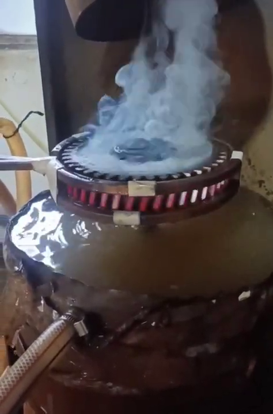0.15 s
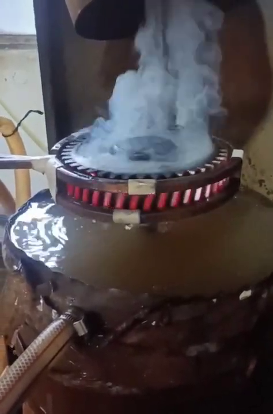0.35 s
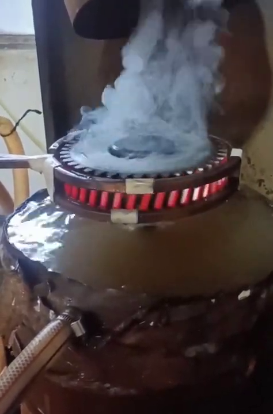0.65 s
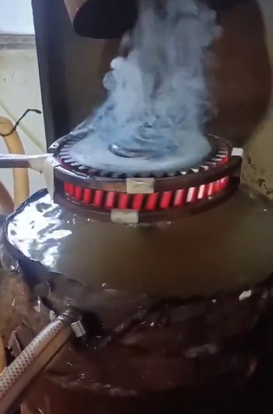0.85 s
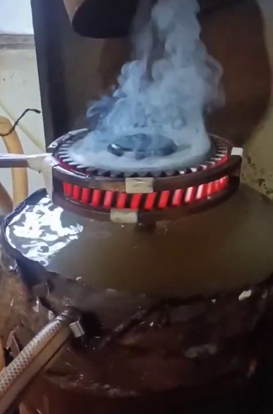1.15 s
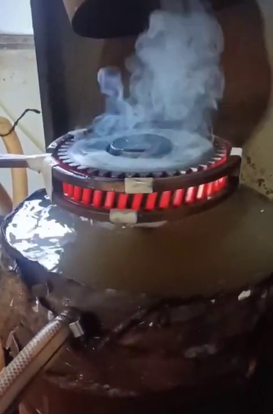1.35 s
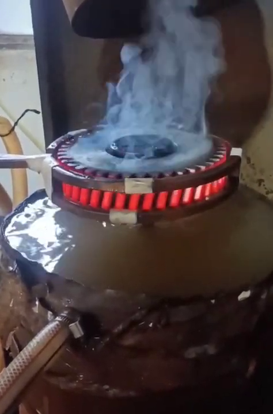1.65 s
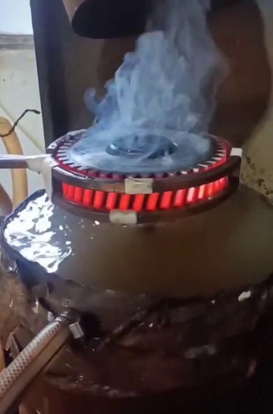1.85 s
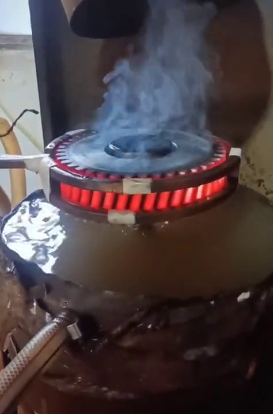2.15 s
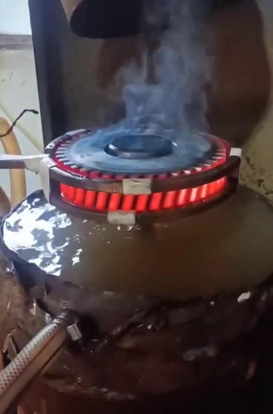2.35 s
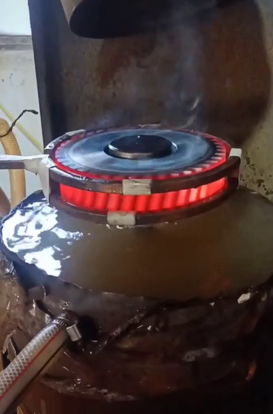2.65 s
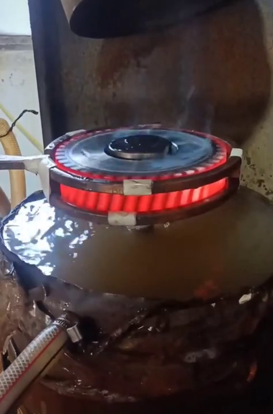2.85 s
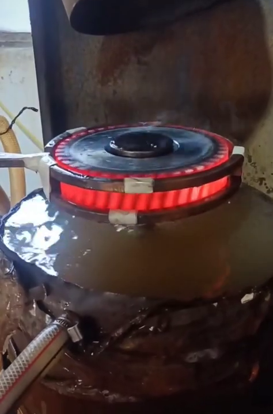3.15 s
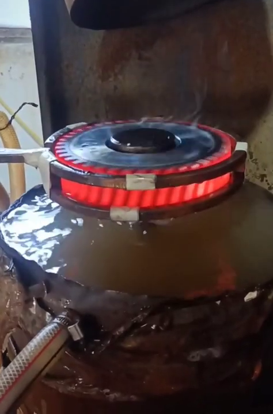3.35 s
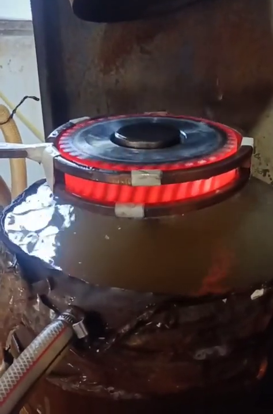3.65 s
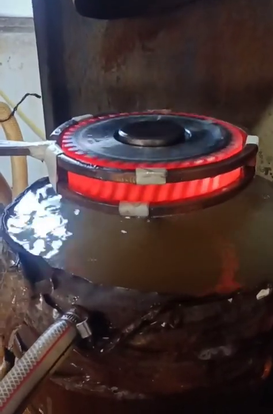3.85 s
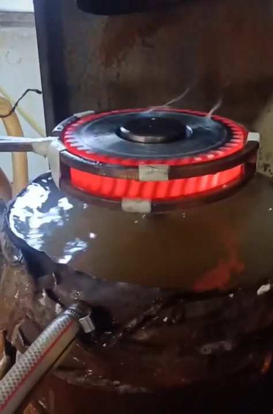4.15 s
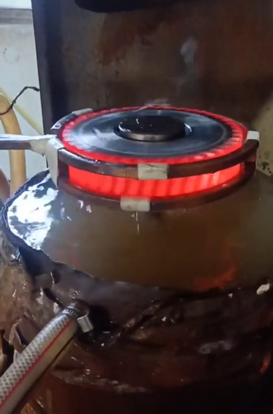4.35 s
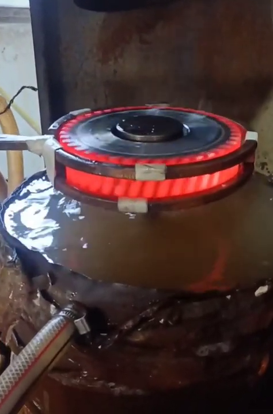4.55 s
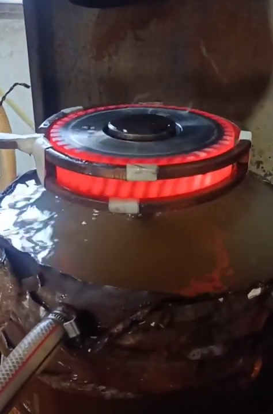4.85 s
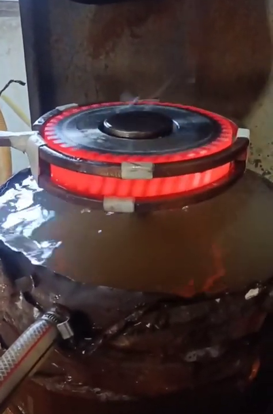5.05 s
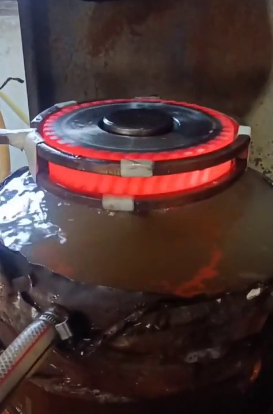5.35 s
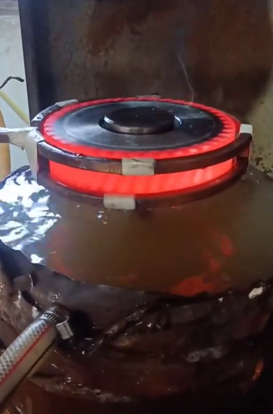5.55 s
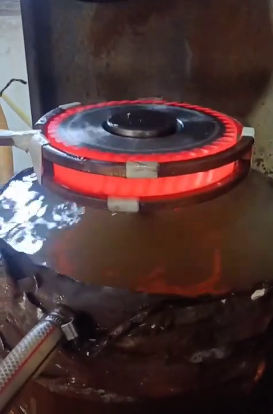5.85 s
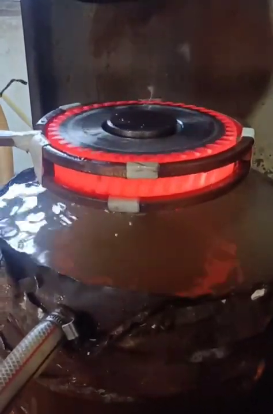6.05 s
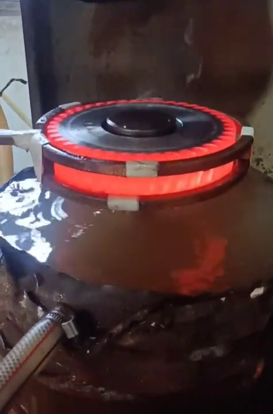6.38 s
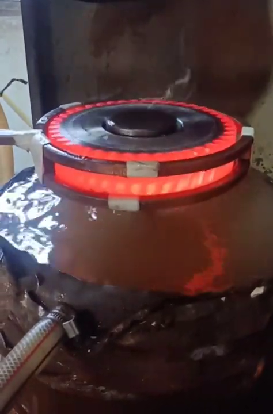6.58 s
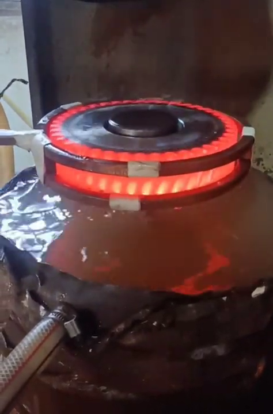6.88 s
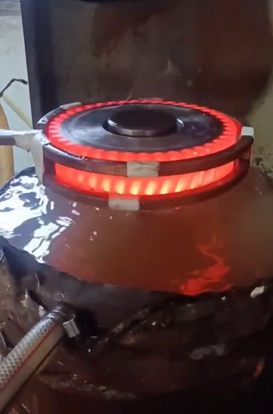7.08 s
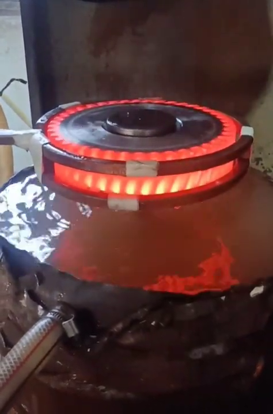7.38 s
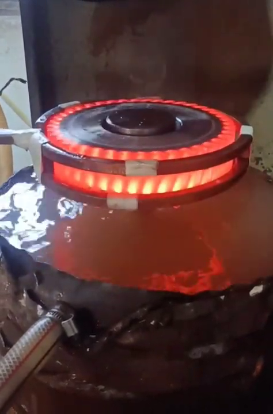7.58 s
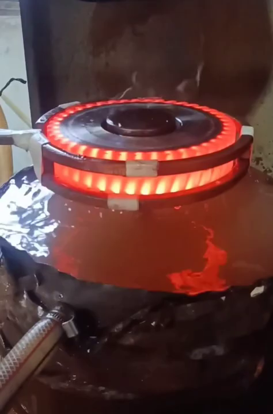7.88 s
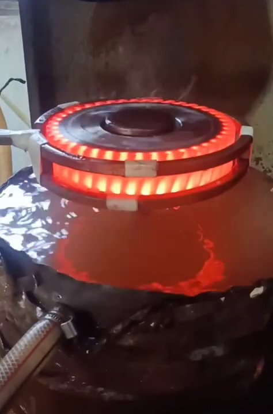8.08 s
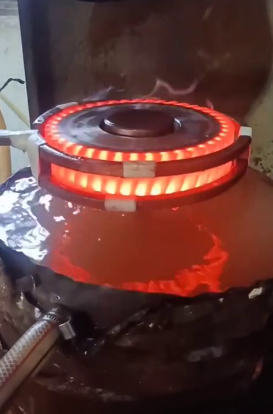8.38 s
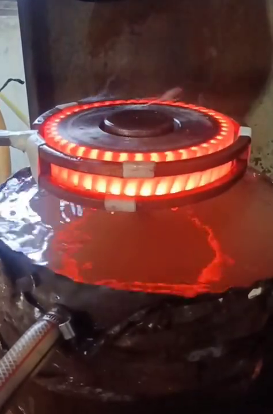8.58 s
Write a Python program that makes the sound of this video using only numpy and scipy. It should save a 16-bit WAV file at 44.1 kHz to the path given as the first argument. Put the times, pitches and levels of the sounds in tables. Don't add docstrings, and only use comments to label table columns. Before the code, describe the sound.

A noisy workshop heard through a phone close to an induction heater. Fans and pumps roar steadily with low hums, air hiss and fine water spray, the level surging and sagging under noise suppression. A faint, piercing coil whine near ten kilohertz creeps upward. At about seven seconds a hand tool further off spins up, whining higher with whistling air, loudest just before the end.

```python
import sys
import numpy as np
from scipy import signal
from scipy.fft import rfft, irfft, next_fast_len
from scipy.io import wavfile
from scipy.ndimage import uniform_filter1d

SR = 44100
rng = np.random.default_rng(int(sys.argv[2]) if len(sys.argv) > 2 else 0)


def gain_from_db(level_db):
    decades = np.asarray(level_db, float) / 20
    return 10 ** decades


def put_to_file(sound):
    columns = np.atleast_2d(sound).T
    safe = np.clip(columns, -1, 1)
    whole_steps = np.round(safe * 32767)
    wavfile.write(sys.argv[1], SR, whole_steps.astype(np.int16))


N = 384552

# middle_s, length_s, floor_rise_db
THINNING = [(.65, .1, 7), (1.1, .25, 2.5), (2.6, .5, 3), (3.35, .14, 6), (4.4, .3, 3), (5.3, .2, 3),
            (6.5, .4, 1.5), (7.3, .4, 2), (7.86, .55, -4), (8.3, .2, 3.5), (8.58, .26, 6)]


def curves(table):
    s, *columns = np.transpose(table)
    return [np.interp(np.arange(N) / SR, s, c) for c in columns]


def across(table, hz):
    f, v = np.transpose(table)
    return np.interp(np.log(hz + 1), np.log(f), v)


def bumps(rows):
    t = np.arange(0, N + 64, 64) / SR
    middle_s, length_s, height = np.transpose(rows)[:, :, None]
    swells = height / (1 + (2 * (t - middle_s) / length_s) ** 6)
    return np.interp(np.arange(N) / SR, t, np.sum(swells, axis=0))


def sides(db, lean_db):
    left = 1 / (1 + gain_from_db(-2 * lean_db))
    return gain_from_db(db) * np.sqrt(2 * np.array([left, 1 - left]))


def walk(rate):
    k = int(SR / rate)
    held = np.repeat(rng.standard_normal(N // k + 1), k)
    return 1.28 * uniform_filter1d(uniform_filter1d(held, k), k)[:N]


def both_walk(rate):
    return np.array([walk(rate), walk(rate)])


def unit(x):
    return x / np.sqrt(np.mean(x ** 2))


def hiss(table, lo_hz, hi_hz, count, flicker_db, rate, lag_s=0):
    # pitch_hz, likeness_0_to_1
    likeness = [(60, 0.86), (130, 0.99), (290, 0.88), (640, 0.42), (1000, 0.01), (3000, 0.26), (7000, 0),
                (12000, 0.3)]
    size = next_fast_len(N)
    hz = np.arange(size // 2 + 1) * SR / size
    one, other = rfft(rng.standard_normal((2, size)))
    alike = np.clip(across(likeness, hz), 0, 1)
    late = one * np.exp(-2j * np.pi * hz * lag_s)
    right = alike * late + np.sqrt(1 - alike ** 2) * other
    pair = np.array([one, right]) * gain_from_db(across(table, hz))
    place = count * np.log((hz + 1) / lo_hz) / np.log(hi_hz / lo_hz)
    inside = (place > 0) & (place < count)
    out = 0
    for k in range(count + 1):
        share = np.sqrt(np.clip(1 - np.abs(place - k), 0, 1)) * inside
        out = out + irfft(pair * share, size)[:, :N] * gain_from_db(flicker_db * both_walk(rate))
    return unit(out)


def wavering(hz, width_hz):
    pole = [1, -np.exp(-1.5 * np.pi * width_hz / SR)]
    drift = signal.lfilter([1], np.convolve(pole, pole), rng.standard_normal((2, N)))
    turning = np.exp(2j * np.pi * np.cumsum(hz * np.ones(N)) / SR)
    return unit(np.real((drift[0] + 1j * drift[1]) * turning))


def suppressor():
    # time_s, left_db, right_db
    rest = [(0.0, -4.13, -3.22), (1.09, -2.08, -1.5), (2.18, -2.06, -2.09), (3.27, -5.24, -3.76),
            (4.36, -4.34, 0.53), (5.45, -7.53, -7.26), (6.54, -7.9, -8.55), (7.63, -5.48, -5.02),
            (8.72, -3.17, -6.72)]
    # middle_s, length_s, lift_db
    left_surges = [(-0.028, 0.129, 5.5), (0.096, 0.044, -3.1), (0.149, 0.174, 3.9), (0.839, 0.045, -2.5),
                   (0.918, 0.04, -2.1), (0.929, 0.637, 4.1), (0.982, 0.041, 2.5), (1.454, 0.04, -2.4),
                   (1.53, 0.343, 7.2), (1.671, 0.117, 3.3), (1.802, 0.072, 2.5), (1.965, 0.057, -3.7),
                   (2.013, 0.088, 1.4), (2.085, 0.413, 3.6), (2.168, 0.061, -3.4), (0.2, 0.06, 3.0),
                   (2.44, 0.071, -2.5), (2.598, 0.407, 2.8), (2.792, 0.065, 2.7), (2.881, 0.082, -2.4),
                   (3.08, 0.106, -5.0), (3.133, 0.4, 9.6), (3.397, 0.06, 2.3), (3.71, 0.074, 4.6),
                   (5.45, 0.07, 3.5), (3.951, 0.187, 6.7), (4.0, 0.029, -2.3), (4.21, 0.03, -2.2),
                   (4.288, 0.092, -5.6), (4.288, 0.33, 11.2), (4.417, 0.027, 2.8), (4.547, 0.161, 5.6),
                   (4.79, 0.11, 6.5), (4.93, 0.366, 9.4), (4.983, 0.129, -5.5), (5.089, 0.046, 4.8),
                   (5.304, 0.279, 3.1), (5.371, 0.04, 4.3), (5.621, 0.082, 2.6), (5.791, 0.152, 8.4),
                   (5.792, 0.041, -2.6), (6.08, 0.082, 6.7), (6.219, 0.032, -2.2), (6.42, 0.093, 1.7),
                   (6.696, 0.229, 6.5), (6.85, 0.06, 3.0), (6.766, 0.025, -2.4), (6.986, 0.115, -8.9),
                   (7.01, 0.28, 12.9), (7.073, 0.046, -5.3), (7.241, 0.034, 2.8), (7.252, 0.159, 5.3),
                   (7.557, 0.131, 4.8), (7.675, 0.026, 2.3), (7.847, 0.037, -1.6), (8.041, 0.037, -2.1),
                   (8.213, 0.097, 1.4), (8.507, 0.071, 1.7), (8.563, 0.034, -1.8), (5.19, 0.07, 6.0)]
    # middle_s, length_s, lift_db
    right_surges = [(0.068, 0.332, 5.6), (0.071, 0.086, -2.2), (0.204, 0.063, 1.6), (0.488, 0.167, 2.2),
                    (0.666, 0.046, 2.3), (0.575, 0.1, -2.5), (1.175, 0.579, 2.3), (1.5, 0.453, 3.9),
                    (1.727, 0.155, 3.8), (2.156, 0.433, 5.6), (2.614, 0.035, -2.4), (2.764, 0.124, 1.8),
                    (2.846, 0.045, -1.8), (2.939, 0.091, 1.9), (3.139, 0.238, 7.8), (3.48, 0.101, 4.8),
                    (3.603, 0.034, -3.1), (1.875, 0.1, -3.0), (3.746, 0.299, 5.2), (3.788, 0.081, -3.2),
                    (3.927, 0.063, 4.5), (4.168, 0.045, -3.0), (4.213, 0.383, 3.2), (4.254, 0.063, 1.9),
                    (4.324, 0.059, -3.0), (4.459, 0.118, 3.5), (2.5, 0.07, 3.0), (4.619, 0.037, 2.5),
                    (4.86, 0.04, -3.3), (4.937, 0.426, 6.1), (4.955, 0.097, -2.2), (5.052, 0.089, 2.4),
                    (5.176, 0.056, 6.6), (5.358, 0.142, 3.7), (5.554, 0.054, 4.3), (5.672, 0.085, -4.1),
                    (5.723, 0.458, 4.8), (5.808, 0.055, 6.3), (5.925, 0.061, -4.4), (7.185, 0.05, -3.0),
                    (6.118, 0.156, 6.8), (6.161, 0.039, -2.4), (6.574, 0.044, -2.2), (6.696, 0.054, -3.3),
                    (6.781, 0.037, 2.6), (6.809, 0.412, 9.5), (6.965, 0.052, -2.1), (7.201, 0.259, 6.3),
                    (7.597, 0.037, 3.1), (7.658, 0.148, 3.4), (7.776, 0.072, -2.3), (7.778, 0.411, 6.3),
                    (8.029, 0.167, 4.6), (8.032, 0.038, -2.7), (8.085, 0.037, 1.9), (8.231, 0.039, 1.5),
                    (8.307, 0.07, -1.7), (8.313, 0.241, 1.3), (6.03, 0.1, 2.5), (8.552, 0.06, -2.7)]
    return np.array(curves(rest)) + np.array([bumps(left_surges), bumps(right_surges)])


def placed(ride_db, level_db, lean_db, share):
    return sides(level_db, lean_db)[:, None] * gain_from_db(share * ride_db)


def fans_and_pumps(ride_db):
    # pitch_hz, level_db_per_hz
    bass = [(25, -32), (50, -27.5), (62, -25), (72, -9), (85, -5), (105, -10.5), (125, -6.5), (200, 0.5),
            (222, -8.5), (314, -4.5), (428, -11.5), (560, -11), (760, -14.5), (1000, -14.5)]
    # pitch_hz, width_hz, level_db, left_minus_right_db
    hums = [(142, 12, -39, -4), (245, 10, -46, -4), (314, 20, -46, -4), (604, 8, -47.5, -5),
            (744, 15, -49.5, -4), (851, 20, -51.5, -6), (994, 6, -58, -5), (1733, 8, -55.5, -3)]
    # middle_s, length_s, swell_db
    roar_swells = [(.25, 0.072, 3), (.5, 0.13, 2), (1.33, 0.11, 1), (2.03, 0.053, -2), (2.42, 0.092, 0.5),
                   (2.9, 0.15, 1.5), (3.95, 0.067, 0), (4.1, .08, 2.5), (4.28, 0.11, 1.5),
                   (4.73, 0.13, 1.5), (5.02, 0.14, -1), (5.8, .06, 1.5), (6.12, 0.089, 2), (6.3, 0.13, 3),
                   (7.05, .08, -1.5), (7.88, .1, -2), (8.3, 0.094, -1.5), (8.45, 0.065, 1)]
    # middle_s, length_s, swell_db
    drone_swells = [
        (1.4, 0.41, 5),
        (2.3, 0.76, -6.5),
        (4.3, 0.24, 0),
        (5.05, 0.41, 4),
        (7.15, 0.17, 6),
    ]
    low = placed(ride_db, level_db=-29.5, lean_db=-4.5, share=1) * gain_from_db(bumps(roar_swells))
    roar = low * hiss(bass, lo_hz=27.4, hi_hz=1009, count=6, flicker_db=1.5, rate=9.7)
    tones = 0
    for hz, width_hz, db, lean_db in hums:
        swell_db = bumps(drone_swells) if hz < 200 else walk(6) - .7
        tones = tones + sides(db, lean_db)[:, None] * wavering(hz, width_hz) * gain_from_db(swell_db)
    return roar + tones * low / sides(-31.5, -5.5)[:, None]


def moving_air(ride_db):
    # pitch_hz, level_db_per_hz
    treble = [(1000, -6.5), (1350, -5), (1750, -4), (2250, -4.5), (2780, 0), (3420, -4), (4750, -4.5)]
    # pitch_hz, left_minus_right_db
    port_lean = [(60, -4.0), (110, -3.0), (200, 0), (380, -4.0), (700, -12), (1290, -2), (2380, -9.5),
                 (4400, -5), (8120, -25), (15000, 0)]
    air = hiss(treble, lo_hz=991, hi_hz=4750, count=5, flicker_db=0.75, rate=9.1, lag_s=23 / SR)
    hz = np.fft.rfftfreq(N, 1 / SR)
    lean_db = (across(port_lean, hz) + 6.07) * np.array([[.5], [-.5]])
    air = irfft(rfft(air) * gain_from_db(lean_db), N)
    return air * placed(ride_db, level_db=-31.5, lean_db=-6.5, share=0.95)


def water_spray(ride_db):
    # pitch_hz, level_db_per_hz
    spray = [(4750, 0), (5400, -1.5), (6850, 0), (6920, -2), (7640, -3.5), (7700, -6), (8600, -7)]
    wet = hiss(spray, lo_hz=4750, hi_hz=8520, count=3, flicker_db=2.0, rate=29)
    return wet * placed(ride_db, level_db=-40.5, lean_db=-2.5, share=0.87)


def top_band(ride_db):
    # pitch_hz, level_db_per_hz
    top = [(11600, 5), (12900, 3), (13100, 8.5), (15400, 6.5)]
    thin = hiss(top, lo_hz=11560, hi_hz=15480, count=3, flicker_db=3.0, rate=42)
    return thin * placed(ride_db, level_db=-38, lean_db=2.7, share=0.91)


def workshop(ride_db):
    chatter = gain_from_db(1.3 * both_walk(32))
    treble = moving_air(ride_db) + water_spray(ride_db) + top_band(ride_db)
    return fans_and_pumps(ride_db) + chatter * treble


def hand_tool(ride_db):
    # pitch_hz, width_hz, level_db, left_minus_right_db
    vents = [(6255, 100, -2, 14), (6812, 65, -1, -2)]
    # time_s, pitch_hz
    rotor_pitch = [(6.95, 2100), (7.62, 2400), (7.85, 2575), (7.98, 2745), (8.15, 2945), (8.3, 3090),
                   (8.43, 3260), (8.6, 3430), (8.72, 3545)]
    # time_s, rotor_db, vent_air_db
    effort = [
        (6.95, -25, -26),
        (7.12, -13, -7.5),
        (7.5, -1, -2),
        (7.62, 0, 0),
        (7.88, 1.5, 2),
        (8.1, 0.5, 0.5),
        (8.5, 10.5, 0),
        (8.64, 9, 2),
        (8.72, -10, -2),
    ]
    # middle_s, length_s, level_db
    rotor_shaded = [
        (7.6, .45, -6),
        (8.27, .14, -2),
    ]
    # middle_s, length_s, level_db
    vents_shaded = [
        (7.85, .44, -8),
    ]
    # middle_s, length_s, level_db
    vents_turned = [
        (7.88, .09, -8),
        (8.13, .09, -8),
    ]
    housing_hz, housing_width_hz = 2716, 244
    strand_hz = 271
    hz, (effort_db, air_db) = curves(rotor_pitch)[0], curves(effort)

    whistles = 0
    for vent_hz, width_hz, db, lean_db in vents:
        whistles = whistles + sides(db, lean_db)[:, None] * wavering(vent_hz, width_hz)
    rush = gain_from_db(-1) * np.array([wavering(6300., 600.), wavering(6300., 600.)]) * sides(0, -5.0)[:, None]
    shade = gain_from_db(np.array([bumps(vents_shaded), bumps(vents_turned)]))
    vent_air = gain_from_db(-39.5 + air_db + 0.64 * ride_db) * shade * (whistles + rush)

    steady = np.sin(2 * np.pi * np.cumsum(hz * (1 + .004 * walk(30))) / SR)
    whine = (.7 * steady + .55 * wavering(hz, 80.)) * gain_from_db(1.5 * walk(14) + bumps(rotor_shaded))
    overtone = wavering(2 * hz, 500.) / (1 + (5600 / (2 * hz)) ** 30)
    whine = (whine + gain_from_db(-2) * overtone) * sides(-49.5, 0.72)[:, None]

    shaken = wavering((hz + housing_hz) / 2, 700.) + .95 * steady
    shaken = shaken + .45 * wavering(hz + strand_hz, 40.) + .35 * wavering(hz - strand_hz, 50.)
    resonance = 1 / (1 + ((hz - housing_hz) / housing_width_hz) ** 4)
    housing = shaken * resonance * sides(-36, -18.0)[:, None]
    return gain_from_db(effort_db + 0.42 * ride_db) * (whine + housing) + vent_air


def coil(ride_db):
    # time_s, pitch_hz
    pitch = [(0, 9955), (1, 9953), (1.65, 10002), (2.3, 10080), (3.3, 10220), (4.3, 10396), (5.3, 10595),
             (5.94, 10732), (6.27, 10803), (7.26, 10903), (7.9, 10935), (8.72, 10945)]
    # time_s, left_db, right_db
    level = [(0, -53.5, -51), (1.2, -49, -53), (2.0, -53, -55), (2.7, -56, -66), (3.2, -51.5, -59),
             (4.2, -47.5, -64), (4.6, -56.5, -57), (6.4, -51.5, -70), (7.6, -55, -68), (8.72, -59, -60)]
    # middle_s, length_s, level_db
    middle_lost = [(.05, .03, -18), (.74, .03, -25), (.82, .02, -20), (1.025, .035, -45),
                   (1.278, .035, -45), (1.51, .07, -50), (1.83, .02, -15), (2.135, .085, -45),
                   (2.69, .02, -40), (2.725, .05, -45), (2.87, .065, -50), (2.995, .015, -30),
                   (4.42, .035, -45), (4.49, .035, -45), (5.52, .065, -50), (6.9, .035, -45),
                   (7.32, .02, -20), (7.735, .015, -30)]
    # middle_s, length_s, level_db
    side_lost = [(.38, .24, -45), (.59, .1, -45), (.87, .06, -45), (1.12, .03, -30), (1.58, .035, -40),
                 (1.78, .06, -45), (2.8, .05, -45), (3.42, .03, -30), (3.56, .04, -30), (3.8, .09, -45),
                 (4.42, .03, -30), (4.72, .08, -45), (5.18, .04, -40), (5.8, .03, -30), (6.16, .06, -40),
                 (6.82, .19, -45), (7.66, .04, -35), (7.8, .14, -45), (7.9, .04, -35), (7.98, .09, -40),
                 (8.13, .14, -45), (8.6, .09, -45)]
    hz = curves(pitch)[0]
    db = np.array(curves(level)) + 0.6 * ride_db
    apart = np.array([np.zeros(N), 1.45 + .4 * walk(17)])
    phase = 2 * np.pi * np.cumsum(hz) / SR + 1.3 * walk(26) + apart
    left, right = gain_from_db(db) * np.sin(phase) / np.sqrt(2)
    lost_db = np.array([bumps(middle_lost), bumps(side_lost)])
    flutter = gain_from_db(2.0 * both_walk(36) - .5 + lost_db)
    middle, side = flutter * np.array([left + right, left - right])
    return np.array([middle + side, middle - side])


def scene():
    ride_db = suppressor()
    return workshop(ride_db) + hand_tool(ride_db) + coil(ride_db)


def thin_out(x):
    # pitch_hz, floor_db
    floor_curve = [(900, -30), (1100, -13), (4700, -13), (5300, -13), (7000, -14), (7600, -10), (7750, .5),
                   (8500, .5), (8700, -20)]
    hz, _, cells = signal.stft(x, SR, nperseg=2048, noverlap=1024, window="cosine")
    power = np.abs(cells) ** 2
    around = uniform_filter1d(power.max(axis=0), size=60, axis=0)
    frame_at = np.minimum(np.arange(power.shape[2]) * 1024, N - 1)
    rise_db = (2.2 * walk(14) + bumps(THINNING) - 1)[frame_at]
    floor = gain_from_db(2 * across(floor_curve, hz))[:, None] * around * gain_from_db(2 * rise_db)
    floor = np.maximum(floor, gain_from_db(2 * -78))
    kept = cells * (uniform_filter1d(power, size=3, axis=1) > floor)
    return signal.istft(kept, SR, nperseg=2048, noverlap=1024, window="cosine")[1][:, :N]


def round_off(x):
    # pitch_hz, step_db
    steps = [(1000, -22), (1500, -14), (2000, -11), (4600, -11), (4800, -2.5), (5700, -2.5), (5900, -5),
             (6900, -5), (7500, -3)]
    frame, start = 1024, 352
    n, k = np.arange(2 * frame), np.arange(48, 352)
    window = np.sin(np.pi * (n + .5) / (2 * frame))
    basis = np.cos(np.pi / frame * np.outer(n + .5 + frame / 2, k + .5)) * window[:, None]
    at = start + frame * np.arange((N - start) // frame - 1)[:, None] + n
    cells = x[:, at] @ basis
    loud = np.sqrt(np.mean(cells.reshape(2, len(at), -1, 16) ** 2, axis=3)).max(axis=0)
    step = np.repeat(loud * gain_from_db(2 * rng.standard_normal(loud.shape)), 16, axis=1)
    step = step * gain_from_db(across(steps, k * SR / 2 / frame)) + 1e-9
    thinning_db = np.maximum(bumps(THINNING)[at[:, frame]], 0)
    step = step * gain_from_db(.8 * np.outer(thinning_db, k > 218))
    rounded = np.sign(cells) * np.floor((np.abs(cells) / step) ** .75 + .4054) ** (4 / 3) * step
    error = (rounded - cells) @ basis.T * 2 / frame
    out = x.copy()
    for first in (0, frame):
        part = slice(first, first + frame)
        out[:, at[:, part]] += error[:, :, part]
    return out


def scraps():
    # middle_s, length_s, flecks_per_s
    bursts = [(2.55, .2, 55), (2.8, .08, 40), (3.52, .24, 50), (4.42, .2, 130), (4.85, .35, 60),
              (5.25, .12, 60), (5.68, .2, 110), (6.1, .25, 70), (3.17, .04, 60), (2.22, .04, 50),
              (6.6, .25, 80), (6.92, .2, 110), (7.5, .15, 90), (7.87, .3, 140), (8.27, .1, 90),
              (8.55, .2, 80)]
    rate = bumps(bursts) + 14 * (np.arange(N) > 4.4 * SR)
    starts = np.searchsorted(np.cumsum(rate) / SR, np.arange(1, rate[:-2048].sum() / SR))
    chance = rng.random((len(starts), 4))
    out, n = np.zeros((2, N)), np.arange(2048)
    for i, (pitch, size, side, late) in zip(starts, chance):
        hz = 9000 + 1300 * pitch ** .7
        fleck = np.sin(np.pi * n / len(n)) ** 2 * np.sin(2 * np.pi * hz * n / SR)
        i = max(i - int(late ** 3 * 5000), 0) // 2048 * 2048
        polarity = np.array([[1], [1 if side > .35 else -1]])
        out[:, i:i + len(n)] += gain_from_db(-68.5 + 6.0 * size) * fleck * polarity
    return out


def low_pass(x):
    return signal.sosfilt(signal.butter(12, 16680, fs=SR, output="sos"), x)


def record(dry):
    thinned = round_off(thin_out(dry))
    mix = thinned + scraps()
    return low_pass(mix)


dry = scene()
out = record(dry)
put_to_file(out)
```